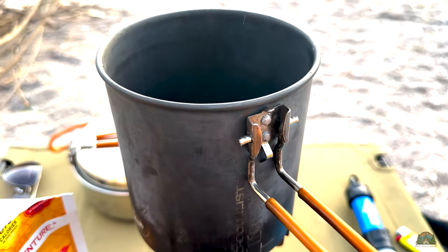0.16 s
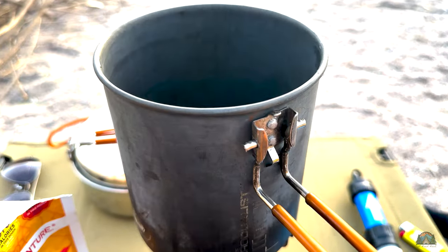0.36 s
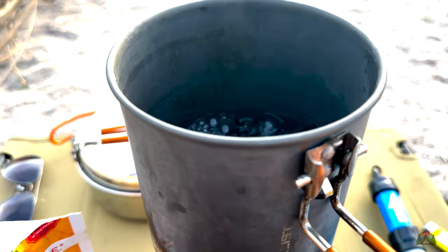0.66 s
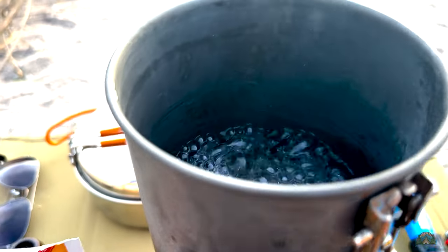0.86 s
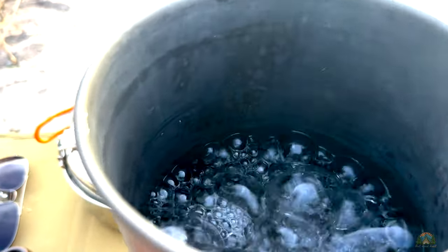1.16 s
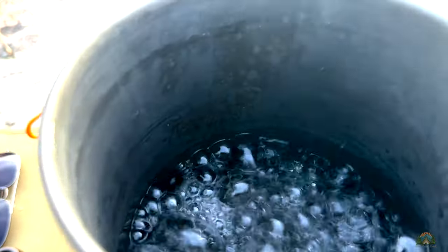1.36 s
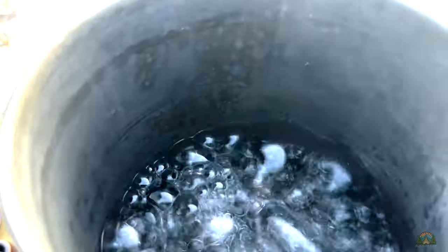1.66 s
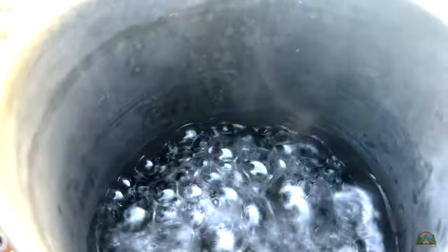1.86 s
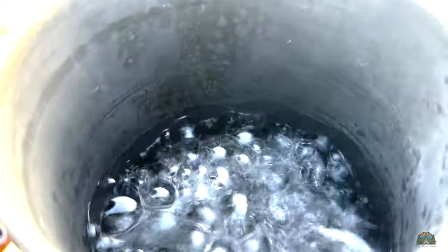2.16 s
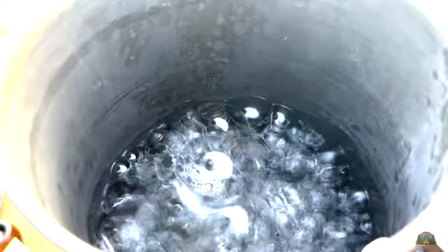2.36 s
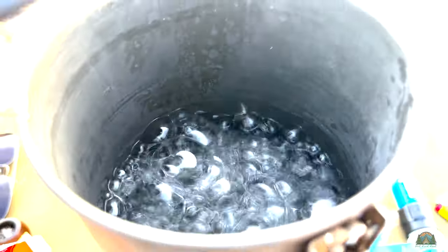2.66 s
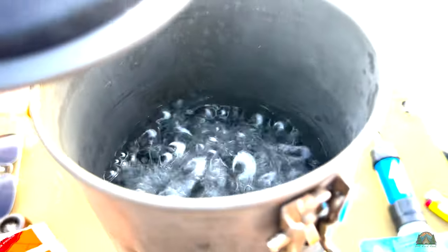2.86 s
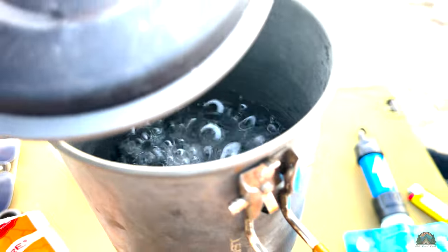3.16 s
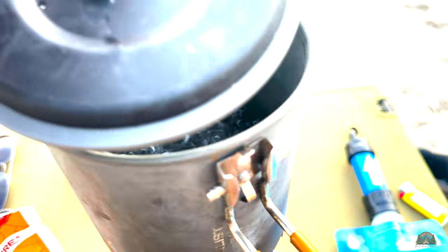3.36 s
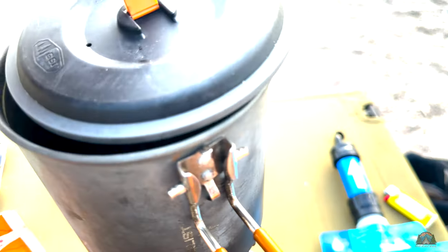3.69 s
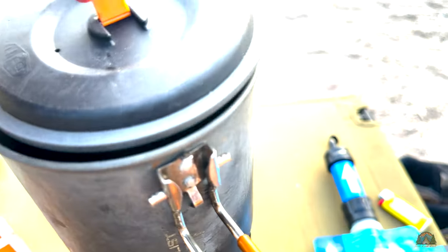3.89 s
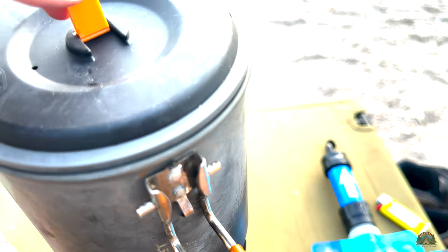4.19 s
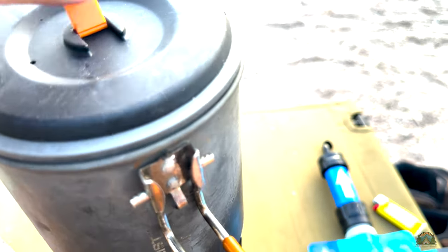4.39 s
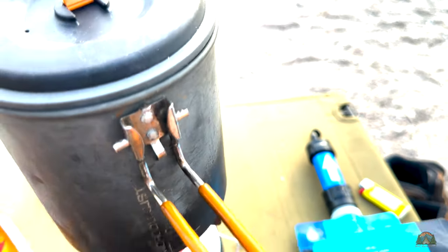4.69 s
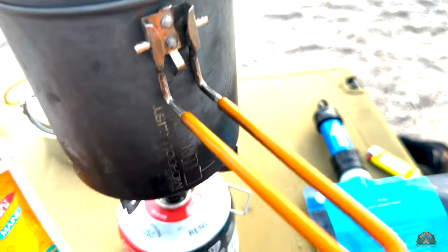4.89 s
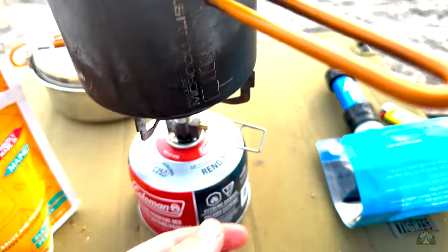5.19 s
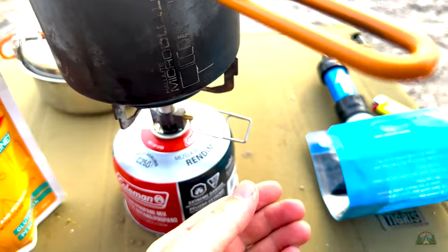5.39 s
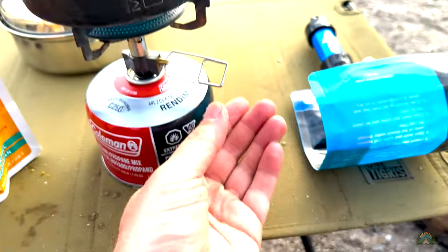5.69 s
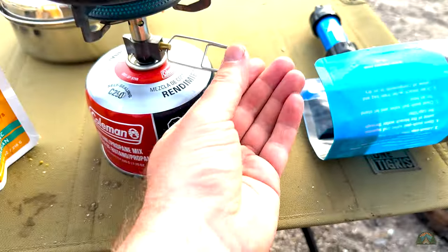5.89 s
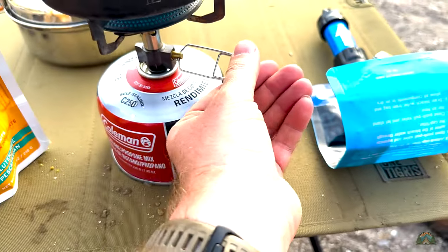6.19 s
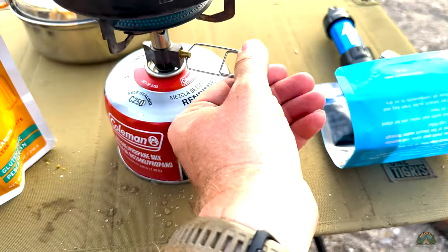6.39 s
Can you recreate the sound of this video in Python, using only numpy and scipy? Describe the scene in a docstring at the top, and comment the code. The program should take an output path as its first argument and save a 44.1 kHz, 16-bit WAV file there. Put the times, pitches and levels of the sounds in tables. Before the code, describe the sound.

Very close outdoors, a gas stove roars low and hisses steadily beneath a metal pot of boiling water. The microphones lean over the mouth, where bubbles burble, crackle and fizz with small pings and soft plops. A lid slides over, the hollow tone sinks and crackle dulls, then a brief light clink. Finally the microphones drop beside the burner, where hiss takes over.

```python
"""Outdoors, close to a gas camp stove: a metal pot of boiling water, a hand-held camera 0.1-0.35 m from it.
Filtered noise roars as flame and hisses as gas; damped tones swarm as burbling, crackling, fizzing water.
Single steam bubbles ping, surface bubbles plop, and small sharp noise bursts tick around the pot.
The microphones lean over the water; the lid goes back, lowering the hollow note, and clinks to rest
over most of the mouth, in scrapes and thin rings; then the microphones sink beside the burner."""
import sys
import numpy as np
from scipy import signal
from scipy.fft import rfft, irfft, next_fast_len
from scipy.io import wavfile
from scipy.ndimage import uniform_filter1d, map_coordinates

SR = 44100
rng = np.random.default_rng(int(sys.argv[2]) if len(sys.argv) > 2 else 0)


def transcribe(signal):
    """Save signal, clipped to [-1, 1], as a 16-bit WAV file at the path in sys.argv[1]."""
    frames = np.atleast_2d(signal).T
    limited = np.clip(frames, -1, 1)
    pcm = np.round(limited * 32767).astype(np.int16)
    wavfile.write(sys.argv[1], SR, pcm)


N = 288502


def amp(db):
    """Decibels to gain."""
    return 10 ** (np.asarray(db) / 20)


def unit(x):
    """Scale to rms 1."""
    return x / np.sqrt(np.mean(x ** 2) + 1e-20)


def along(points, hz):
    """Read (f/Hz, value) points on a log frequency axis."""
    f, v = np.transpose(points)
    return np.interp(np.log(hz + 1), np.log(f + 1), v)


def curves(rows):
    """One value per sample for each column after the time."""
    s, *cols = np.transpose(rows)
    return [np.interp(np.arange(N) / SR, s, c) for c in cols]


def wobble(rate):
    """A smooth random curve, rate knots a second."""
    knots = rng.standard_normal(4096)
    return map_coordinates(knots, [np.arange(N) * rate / SR], mode="wrap")


def noise():
    """Two unrelated white noises."""
    return rng.standard_normal((2, N))


def filtered(x, response):
    """x times a complex response of frequency."""
    m = next_fast_len(N + SR // 2)
    return irfft(rfft(x, m) * response(np.fft.rfftfreq(m, 1 / SR)), m)[..., :N]


def hump(hz, centre, width):
    """The outline of a resonance, 1 at its centre."""
    return 1 / (1 + (2 * (hz - centre) / width) ** 2)


def humps_db(hz, modes):
    """Sum of resonant humps in dB."""
    return sum(db * hump(hz, f, width) for f, width, db in modes)


def coloured(x, spectrum, modes=()):
    """Give x a broad spectrum with resonant humps on it."""
    return filtered(x, lambda hz: amp(along(spectrum, hz) + humps_db(hz, modes)))


def struck(x, spectrum):
    """Colour a click with minimum phase, so that it rings only after its onset."""
    def response(hz):
        cepstrum = irfft(np.log(amp(along(spectrum, hz))))
        half = len(cepstrum) // 2
        causal = np.r_[cepstrum[0], 2 * cepstrum[1:half], np.zeros(half)]
        return np.exp(rfft(causal))
    return filtered(x, response)


def patchy(pair, depth_db):
    """Let narrow bands swell and sink on their own, some tens of milliseconds at a time."""
    z = signal.stft(pair, nperseg=512)[2]
    field = uniform_filter1d(rng.standard_normal(z.shape[1:]), size=5, axis=0)
    field = uniform_filter1d(field, size=16, axis=1)
    return signal.istft(z * amp(depth_db * unit(field)), nperseg=512)[1][:, :N]


def add(track, s, sound):
    """Mix a short sound into a track at time s."""
    part = track[..., max(round(s * SR), 0):][..., :sound.shape[-1]]
    part += sound[..., :part.shape[-1]]


def panned(x, left_db):
    """Lean a sound to the left microphone by left_db."""
    return x * amp([[left_db / 2], [-left_db / 2]])


def blend(a, b, share):
    """Pass from a to b at constant power."""
    share = np.clip(share, 0, 1)
    return np.sqrt(1 - share) * a + np.sqrt(share) * b


def bubbles(count, hz, spread, cycles, scatter_db, rise, size):
    """Two unrelated swarms of damped, rising bubble tones, rms 1; each lasts at most size samples."""
    when, big, which = rng.random((count, 3)).T[:, :, None]
    pitch = np.clip(hz * np.exp(spread * rng.standard_normal((count, 1))), 1, SR / np.pi)
    turns = pitch * np.arange(size) / SR
    fade = np.exp(-turns / cycles)
    level = amp(-scatter_db * np.log(big + 1 / 100))
    tone = level * fade * np.sin(2 * np.pi * turns * (1 + rise * (1 - fade)))
    # both swarms lie end to end on one long track
    at = (when * N).astype(int) + np.arange(size) + (which > .5) * (N + size)
    track = np.bincount(at.ravel(), tone.ravel(), 2 * (N + size))
    return unit(track.reshape(2, -1)[:, :N])


# the two microphones: left over right (f/Hz, level/dB)
LEAN = [(60, .5), (330, 1), (750, 5), (1200, 1.5), (1800, 1), (2700, -3.5), (4000, -3.5), (5300, -1.5),
        (6800, 5.5), (8600, -4.5), (15000, 0.5)]
# phase by which the left microphone leads (f/Hz, lead/rad)
LEAD = [(30, 0), (330, .1), (700, .5), (1370, -.2), (1900, 1.2), (2380, 3.1), (2750, 4.6), (3100, 6.2),
        (3650, 7.2), (4350, 9.4), (5000, 11.9), (5700, 13.6), (6550, 15.1), (7400, 14.3), (8400, 18),
        (10300, 16.1), (11250, 15.7), (12050, 15), (14100, 12.6)]
# how alike the two microphones hear (f/Hz, likeness 0-1)
ALIKE = [(90, .995), (330, 0.98), (520, 0.68), (800, 0.85), (1500, 0.25), (2200, 0.28), (3100, 0.37),
         (5000, 0.38), (7000, 0.51), (8500, 0.69), (9400, 0.74), (11100, 1), (12800, 1), (14500, 0.86)]


def ports(pair, lean=LEAN, lead=LEAD, alike=ALIKE):
    """Two unrelated signals become a stereo field of rms 1, its likeness, lean and phase set by pitch."""
    m = next_fast_len(N + SR // 2)
    hz = np.fft.rfftfreq(m, 1 / SR)
    turn = np.arccos(np.clip(along(alike, hz), 0, 1)) / 2
    mid, side = rfft(pair, m) * [np.cos(turn), np.sin(turn)]
    half = amp(along(lean, hz) / 2) * np.exp(.5j * along(lead, hz))
    return unit(irfft(np.array([(mid + side) * half, (mid - side) / half]), m)[:, :N])


# the lid closes over the mouth, then rests part open (t/s, share of the mouth covered 0-1)
COVER = [(2.85, 0), (3.5, 0.36), (3.93, 0.62), (4.1, 1), (4.42, 0.7)]


def cover():
    """How far the lid covers the pot, 0-1."""
    return np.clip(curves(COVER)[0], 0, 1)


# path of the microphones (t/s, distance from the water/m, place: 0 above the pot - 1 beside the burner)
MIC_PATH = [(0, .3, 0.25), (.55, 0.18, 0.21), (1.05, 0.14, 0.016), (1.5, 0.1, 0.056), (2.9, 0.12, 0.024),
            (3.5, 0.14, 0.016), (4.5, 0.13, 0.063), (4.9, 0.35, 0.31), (5.35, 0.21, 0.95),
            (5.8, 0.21, 0.86), (6.54, 0.18, 0.93)]
NEAR_M = .1


def reach_db(reach):
    """A sound's level changes with microphone distance, under the lid and beside the burner."""
    near_db, doubling_db, lid_db, wall_db = reach
    distance, beside = curves(MIC_PATH)
    return near_db - doubling_db * np.log2(distance / NEAR_M) - lid_db * cover() - wall_db * beside


# spectrum of the roar under the pot (f/Hz, relative level per Hz/dB)
ROAR = [(15, -22), (30, -35), (45, -14.5), (65, -6), (100, -2), (160, -1), (280, 1), (380, -8), (500, -18),
        (750, -21), (1100, -30), (2000, -47), (5000, -100)]
# resonances of the flame under the pot (f/Hz, width/Hz, level/dB)
ROAR_MODES = [(90.7, 11.3, 8), (127.3, 27.5, 5), (203.7, 24, 5)]
# the flame from the side, through the gap under the pot (f/Hz, relative level per Hz/dB)
FLAME_GAP = [(40, -44), (70, 0.5), (90, 8), (120, -22), (220, -10.5), (310, 0.5), (420, -2), (490, -15.5),
             (700, -37), (2000, -46)]
# how the roar carries, before swelling and flicker
# (level at NEAR_M/dB, loss per doubled distance/dB, loss under the lid/dB, loss beside the burner/dB)
FLAME_REACH = (-43.5, 0.1, 1, -0.5)
# slow uneven swelling of the roar (t/s, level/dB)
ROAR_SWELL = [(0, 0.8), (.4, 0.5), (.58, -1.5), (.72, 0), (1.25, -0.5), (1.68, 1), (2.3, -1.5), (2.6, 1.5),
              (3.07, -1.4), (3.25, .8), (3.7, -0.9), (4.14, 1.7), (4.35, -1.3), (4.8, 0.5), (5.65, -0.9),
              (6.1, 1), (6.54, -1)]
# the flame's flicker: depth in dB, knots per s
FLICKER_DB, FLICKER_RATE = 0.76, 9


def flame():
    """Turbulent burning rumbles under the pot; from the side the gap adds a rawer edge."""
    beside = np.clip(curves(MIC_PATH)[1], 0, 1)
    under = unit(coloured(noise(), ROAR, ROAR_MODES))
    edge = amp(-5.0) * np.sqrt(beside) * unit(coloured(noise(), FLAME_GAP))
    roar = ports(under + edge)
    # level the roar's own slow drift, so that its strength follows the curves below
    drift = np.sqrt(np.abs(uniform_filter1d(np.mean(roar ** 2, axis=0), size=SR // 6)))
    level_db = reach_db(FLAME_REACH) + curves(ROAR_SWELL)[0] + FLICKER_DB * wobble(FLICKER_RATE)
    return amp(level_db) * roar / drift


# the hiss above the open pot (f/Hz, relative level per Hz/dB)
JET = [(300, -9), (900, -0.5), (1350, 0.5), (1900, -0.5), (2300, 0.5), (2750, 3.5), (3700, -7), (5000, -1),
       (6800, -11), (9500, -4.5), (12000, 1), (15000, -2.5), (17000, -4)]
# the hiss once the lid covers the pot (f/Hz, relative level per Hz/dB)
LIDDED = [(300, 4), (900, 1.5), (1350, 2), (1900, 0.5), (2400, 4.5), (2750, -1.5), (3150, 0), (3700, -4.5),
          (4400, 1.5), (5200, 2.5), (6400, -1), (7200, -17), (8700, 2), (9600, -13), (12000, 1),
          (15000, -6), (17000, -0.5)]
# the hiss beside the burner (f/Hz, relative level per Hz/dB)
BURNER = [(200, -52), (420, -3), (700, 4), (1250, -1.5), (1700, 2), (2050, 0.5), (2450, 3.5), (2850, 3),
          (3200, -1.5), (3600, 0), (4600, 1), (5500, 1), (6800, -4), (8300, 2.5), (9300, -10), (13000, -23),
          (16000, -9)]
# resonances of the burner head (f/Hz, width/Hz, level/dB)
JET_MODES = [(3130, 160, 5.5), (5460, 150, 4.5), (8390, 480, 6.5)]
# likeness at the two microphones once the lid covers the pot (f/Hz, likeness 0-1)
LIDDED_ALIKE = [(500, .7), (1500, .45), (1950, .5), (2200, .92), (2500, .95), (2750, .6), (3150, .8),
                (4000, .8), (4400, .97), (5000, .8), (6600, .75), (8500, .8), (11100, .95), (14500, .85)]
# microphones beside the burner: left over right (f/Hz, level/dB)
BURNER_LEAN = [(400, 5), (1200, 6.5), (2000, -3.5), (3000, 1), (4300, -2), (5500, 11.5), (6700, 13),
               (7700, 15.5), (8500, 3), (10000, 27), (15000, -16)]
# phase by which the left leads there (f/Hz, lead/rad)
BURNER_LEAD = [(100, 0.39), (700, 1.2), (1370, 2), (1650, 3), (1950, 2.4), (2400, 6.1), (2750, 7.3),
               (3100, 7.7), (3600, 9.4), (4300, 12.5), (5000, 14.7), (5700, 14.6), (7400, 21.5), (8300, 25),
               (9500, 26.5), (11200, 28.3), (14100, 26)]
# likeness at the two microphones there (f/Hz, likeness 0-1)
BURNER_ALIKE = [(500, 0.2), (1350, 1), (1650, 0.42), (2400, 0.78), (2900, 0.6), (3600, 0.96), (4300, 0.85),
                (5500, 0.3), (6600, 0.5), (8300, 1), (14500, 1)]


def gas_jet():
    """Gas hisses through the burner head; the lid recolours it, and beside the burner it also sputters."""
    def hiss(spectrum, grains=0):
        return coloured(patchy(noise() + grains, depth_db=1.5), spectrum, JET_MODES)

    flutter = amp(0.6 * wobble(28) + 0.45 * wobble(9.2))
    sputter = .23 * bubbles(count=2200, hz=2750, spread=.2, cycles=1.8, scatter_db=3.3, rise=0, size=160)
    shaded = amp(-56.0) * ports(hiss(JET))
    lidded = amp(-56.0) * ports(hiss(LIDDED), alike=LIDDED_ALIKE)
    direct = amp(-55) * ports(hiss(BURNER, sputter), BURNER_LEAN, BURNER_LEAD, BURNER_ALIKE)
    # a half-covered mouth already hides the water from the microphones
    above = blend(shaded, lidded, 2 * cover())
    return flutter * blend(above, direct, curves(MIC_PATH)[1])


# resonances of the air under the lid (f/Hz, width/Hz, level/dB)
COVERED_MODES = [(1340, 270, 15.5), (3190, 170, 15)]
# the hollow note of the pot's air: pitch with the mouth open and covered, width, height
HOLLOW_OPEN_HZ, HOLLOW_SHUT_HZ, HOLLOW_WIDTH_HZ, HOLLOW_DB = 740, 440, 160, 6


def pot_air(pair):
    """The pot's hollow note sinks as the lid narrows the mouth, and the covered air begins to ring."""
    hz, s, z = signal.stft(pair, SR, nperseg=1024)
    hz, shut = hz[:, None], np.interp(s, np.arange(N) / SR, cover())
    note = HOLLOW_OPEN_HZ + (HOLLOW_SHUT_HZ - HOLLOW_OPEN_HZ) * shut ** 1.4
    hollow_db = HOLLOW_DB * hump(hz, note, HOLLOW_WIDTH_HZ)
    covered_db = np.sqrt(shut) * humps_db(hz, COVERED_MODES)
    return signal.istft(z * amp(hollow_db + covered_db), SR, nperseg=1024)[1][:, :N]


# spectrum of the big bubbles (f/Hz, relative level per Hz/dB)
BUBBLING = [(150, -18), (300, 8.5), (400, 0.5), (520, -2), (750, -4), (1000, -8), (1150, -5.5), (1370, -3),
            (1600, -20), (2400, -24), (3200, -24), (6000, -41)]
# how the burble carries, before rolling and heaving
# (level at NEAR_M/dB, loss per doubled distance/dB, loss under the lid/dB, loss beside the burner/dB)
BURBLE_REACH = (-55, 3.5, 5.5, 9)
# how hard the water rolls (t/s, level/dB)
ROLLING = [(0, 0), (.3, 5.5), (.7, 0.5), (.95, 2.5), (1.55, 4), (2.1, 2.5), (2.5, 2.5), (3, 0.5), (3.8, 3),
           (4.2, -0.5), (6.54, 1)]
# the rolling water heaves: depth in dB, knots per s
HEAVE_DB, HEAVE_RATE = 0.6, 14


def burble():
    """Big bubbles bloom over a fine churning and stir the air in the pot, in surges as the water rolls."""
    churn = bubbles(count=7500, hz=666, spread=0.456, cycles=2.8, scatter_db=1.5, rise=0.087, size=600)
    blooms = bubbles(count=1600, hz=620, spread=.33, cycles=5, scatter_db=1.8, rise=.12, size=1800)
    water = churn + .8 * blooms + .8 * noise()
    level_db = reach_db(BURBLE_REACH) + curves(ROLLING)[0] + HEAVE_DB * wobble(HEAVE_RATE)
    return amp(level_db) * ports(pot_air(coloured(water, BUBBLING)))


# spectrum of the crackle in the pot's mouth (f/Hz, relative level per Hz/dB)
MOUTH = [(700, -13), (1350, -6), (1750, -5.5), (2200, -3), (3000, -6), (4500, -1.5), (6300, -10),
         (7500, -2), (9500, 0), (13000, -39)]
# resonances of the air in the open pot (f/Hz, width/Hz, level/dB)
POT_MODES = [(1330, 170, 9), (2200, 150, 5), (3760, 56, 7.5), (4830, 380, 2), (5270, 250, 4),
             (7260, 410, 8), (8420, 790, 9.5)]
# the pot's mouth at the microphones: left over right (f/Hz, level/dB)
MOUTH_LEAN = [(2000, -2), (3900, -6), (5500, 13.5), (7300, 11.5), (8600, 5), (13000, 13)]
# spectrum of the fizz, which also serves as the burner's top hiss (f/Hz, relative level per Hz/dB)
FIZZ = [(2000, -25), (7000, 3.5), (9500, 2), (12000, 7), (13700, 0.5), (15100, 5), (16000, -24)]
# how the crackle carries, before its surges
# (level at NEAR_M/dB, loss per doubled distance/dB, loss under the lid/dB, loss beside the burner/dB)
CRACKLE_REACH = (-55, 5.5, 14, 17)
# the fizz over the pot, joined by the burner's top hiss beside it: same columns, a negative loss is a gain
FIZZ_REACH = (-56, 5.5, -1, -2.5)


def simmer():
    """Small bubbles crackle and films fizz over the pot; the burner's top hiss joins the fizz beside it."""
    surge = wobble(18)
    small = bubbles(count=20000, hz=5540, spread=0.415, cycles=2.6, scatter_db=5.0, rise=0.08, size=160)
    grains = bubbles(count=18000, hz=10930, spread=0.44, cycles=3.0, scatter_db=5.0, rise=0, size=48)
    mouth = coloured(patchy(small + 0.93 * noise(), depth_db=2.5), MOUTH, POT_MODES)
    crackle = amp(reach_db(CRACKLE_REACH) + 0.96 * surge) * ports(mouth, MOUTH_LEAN)
    fizz = amp(reach_db(FIZZ_REACH) + .5 * surge) * ports(coloured(grains + noise(), FIZZ))
    return crackle + fizz


def pops(rows, swell_cycles):
    """Single bubbles: each tone swells and dies within a few cycles, and a weaker neighbour follows."""
    track, t = np.zeros(N), np.arange(SR // 30) / SR
    for (s, db, hz), (wait, detune) in zip(rows, rng.random((len(rows), 2))):
        swell = hz * t / swell_cycles
        shape = amp(db) * swell * np.exp(1 - swell)
        add(track, s, shape * np.sin(2 * np.pi * hz * t))
        neighbour = np.sin(2 * np.pi * hz * (.92 + .2 * detune) * t)
        add(track, s + .006 + .016 * wait, amp(-12) * shape * neighbour)
    return track


# the loudest steam bubbles collapsing in the pot (t/s, relative level/dB, f/Hz)
PINGS = [(.092, -44, 2930), (.2746, -40.5, 3046), (.3925, -42, 3080), (.427, -45, 2580), (.4735, -53, 3020),
         (.4803, -39.5, 3030), (.516, -42, 3800), (.5408, -34, 3160), (.622, -41, 3040),
         (.6463, -37.5, 4760), (1.238, -44, 3060), (1.532, -41.5, 2940), (1.8412, -44, 3140),
         (1.9435, -39, 3230), (2.181, -47, 3140), (2.639, -42, 3250), (2.9532, -39, 3900),
         (3.3124, -45, 3240), (3.379, -44, 3180), (3.8615, -46, 3200), (3.8732, -33.5, 3150),
         (3.8865, -52, 3130), (3.984, -42, 3230), (4.1305, -46, 3250), (4.2277, -42, 3270),
         (4.3036, -39, 3400), (4.3325, -48, 3220), (4.685, -45, 3040), (5.002, -45, 3150),
         (5.1137, -41, 3050), (5.1926, -39, 3020), (5.496, -46, 2940)]
# large bubbles bursting at the surface (t/s, relative level/dB, f/Hz)
PLOPS = [(.562, -39.5, 745), (.638, -43, 1300), (.773, -42, 700), (.8525, -39.5, 870), (.87, -48, 1020),
         (.892, -41, 650), (1.06, -46, 1000), (1.091, -42, 710), (1.36, -45, 990), (1.399, -42, 684),
         (1.433, -38.5, 717), (1.596, -40, 581), (1.775, -45, 926), (1.911, -41, 584), (2.084, -44, 837),
         (2.479, -43, 710)]
# the swarm of weak steam bubbles comes in spells (t/s, level/dB)
SPELLS = [(0, -76), (.45, -67), (.85, -70), (1.9, -68), (3.4, -68), (3.88, -69), (4.3, -64.5), (4.6, -67),
          (5, -70.5), (5.2, -64.5), (5.55, -73), (6.54, -70)]


def pings():
    """Steam bubbles collapse with a ping, over a crackling swarm of weak ones; the largest plop at the surface."""
    swarm = bubbles(count=1200, hz=3130, spread=0.07, cycles=4.5, scatter_db=3.4, rise=0, size=240)
    single = panned(amp(-6.0) * pops(PINGS, swell_cycles=2.2), left_db=-7.5)
    deep = panned(amp(-3.0) * pops(PLOPS, swell_cycles=0.91), left_db=4)
    return single + deep + amp(curves(SPELLS)[0]) * ports(swarm)


def strays(rate, means, scatters):
    """Rows (t/s, value, value) of chance events, about rate a second."""
    gap, *draws = rng.standard_normal((3, 128))
    # sqrt(pi / 2) brings the mean gap to 1 / rate
    s = np.cumsum(np.abs(gap)) * np.sqrt(np.pi / 2) / rate
    return np.column_stack([s, means + np.transpose(draws) * scatters])[s < N / SR]


# the loudest ticks of hot metal and spatter (t/s, relative level of the top/dB, of the lower snap/dB)
TICKS = [(.368, -28, -51), (.488, -56, -57.5), (.8325, -54, -56), (2.775, -50, -61), (2.932, -54, -61),
         (3.218, -46, -62), (3.3017, -46, -57), (4.083, -44, -57.5), (4.56, -54, -57), (4.575, -38, -58),
         (4.767, -56, -59), (5.0754, -38, -60), (5.5958, -48, -56), (5.936, -47, -58), (6.2125, -42.5, -56),
         (6.351, -39, -60)]
# spectrum of the lower snap (f/Hz, relative level/dB)
SNAP = [(1000, -13), (3000, 5), (5500, 12.5), (7300, 16), (10000, 7.5), (16000, -59)]
# spectrum of the top of a snap (f/Hz, relative level/dB)
SNAP_TOP = [(3000, -22), (6000, -12), (9000, 3), (11500, 3), (13300, 11), (14800, 11), (17000, 1)]
# fall by 60 dB before colouring, in s
TICK_T60_S = 0.005
# faint random ticks: number per s, relative levels on the scale of TICKS, their scatter
TICK_RATE, TICK_TOP_DB, TICK_LOW_DB, TICK_SCATTER_DB = 3, -53, -64, 2


def ticks():
    """Hot metal and spatter snap: random-sign bursts of a few milliseconds, a top and a lower part."""
    top, low, t = np.zeros(N), np.zeros((2, N)), np.arange(SR // 100) / SR
    faint = strays(TICK_RATE, [TICK_TOP_DB, TICK_LOW_DB], TICK_SCATTER_DB)
    for s, top_db, low_db in [*TICKS, *faint]:
        burst = np.sign(rng.standard_normal((3, len(t)))) * amp(-60 * t / TICK_T60_S)
        add(top, s, amp(top_db - 8.5) * burst[0])
        add(low, s, amp(low_db + 10.5) * burst[1:])
    # the top is the same at both microphones
    return struck(top, SNAP_TOP) + struck(low, SNAP)


# the lid's rim chatters on the pot (t/s, relative level/dB)
LID_CONTACTS = [(4.4128, -38), (4.4158, -41), (4.418, -49)]
# ringing of the rim (f/Hz, relative level/dB, t60/s)
RIM = [(3050, -14, .04), (7500, -8, .03), (8460, -5, .033), (11790, 1, .035), (12450, -6, .025),
       (13400, -3, .022), (14320, -5, .03), (15220, -4, .03)]


def lid():
    """The rim chatters on the pot: each contact is a short scrape and a thin ring."""
    ring, scrape, t = np.zeros((2, N)), np.zeros((2, N)), np.arange(SR // 6) / SR
    for s, db in LID_CONTACTS:
        for hz, mode_db, t60 in RIM:
            phase = 2 * np.pi * rng.random((2, 1))
            ring_db = db + mode_db - 6 + rng.normal(0, 1) - 60 * t / t60
            add(ring, s, amp(ring_db) * np.sin(2 * np.pi * hz * t + phase))
        add(scrape, s, amp(db - 60 * t / .016) * rng.standard_normal((2, len(t))))
    return ring + struck(scrape, [(1000, -11), (4000, 2.5), (14000, 5.0)])


def scene():
    """Stove, water and lid in the open air."""
    return flame() + gas_jet() + burble() + simmer() + pings() + ticks() + lid()


TOP_HZ = 15900


def record(dry):
    """The camera keeps nothing above its band limit."""
    return filtered(dry, lambda hz: hz < TOP_HZ)


dry = scene()
out = record(dry)
transcribe(out)
```